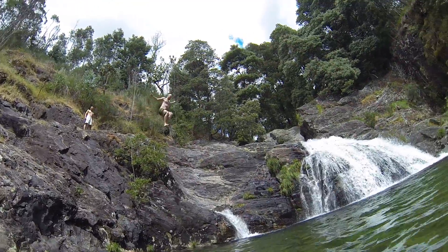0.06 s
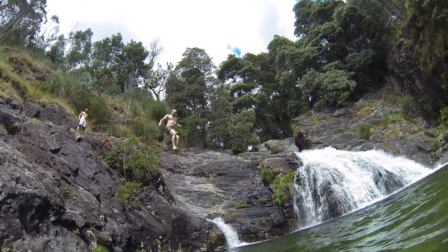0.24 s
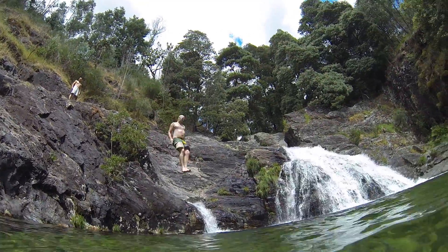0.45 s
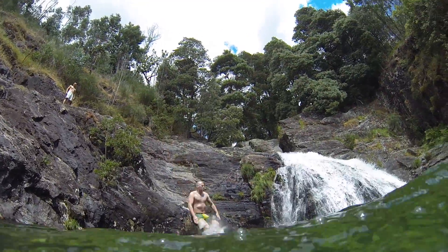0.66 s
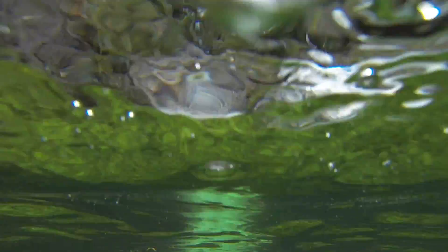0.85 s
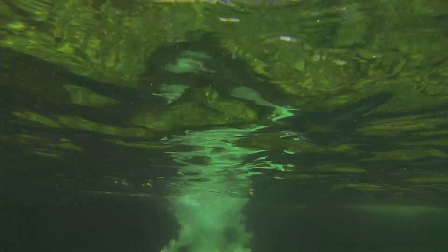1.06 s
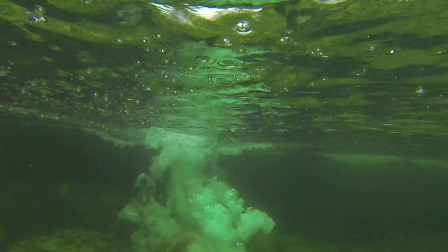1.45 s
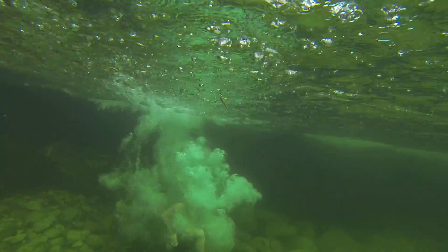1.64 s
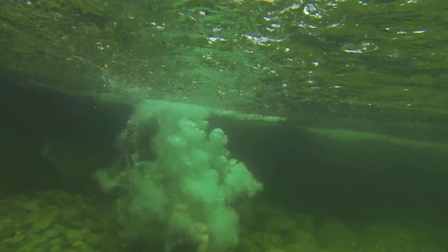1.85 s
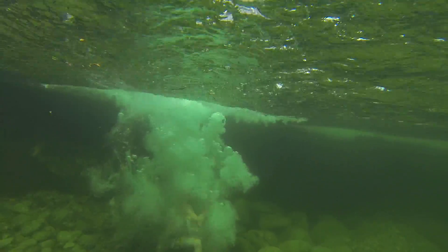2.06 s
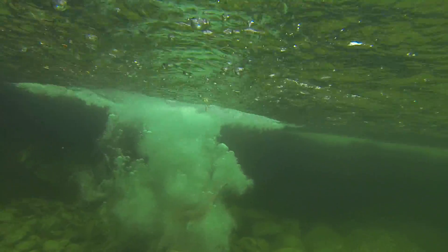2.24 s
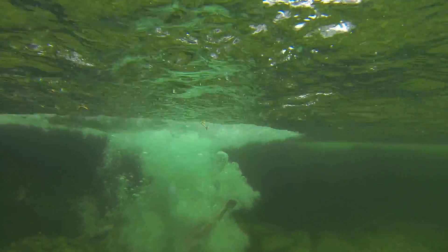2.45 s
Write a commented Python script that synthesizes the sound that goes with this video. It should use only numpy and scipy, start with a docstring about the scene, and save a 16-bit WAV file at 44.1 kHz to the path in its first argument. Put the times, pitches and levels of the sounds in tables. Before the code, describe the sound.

Water slaps and gulps close by, then gives way to a muffled underwater gurgling roar.

```python
"""Dipping under at a waterfall pool

A camera in a waterproof housing bobs on a pool below a waterfall, then dips under as someone jumps in.
Wavelets slap the housing and excite the air cavity at its microphone. Bubbles pinch off and ring
as mass-spring oscillators, a large one with a deep gulp. Under water the roar of the fall and of
the jumper's bubble cloud swells over a low rumble."""
import sys
import numpy as np
from scipy import signal
from scipy.fft import rfft, irfft
from scipy.io import wavfile
from scipy.ndimage import uniform_filter1d

SR = 44100
rng = np.random.default_rng(int(sys.argv[2]) if len(sys.argv) > 2 else 0)


def transcribe(u):
    """Save the signal u as a 16-bit wav file named by the first command-line argument.

    u: samples, shape (n,) or (channels, n), limited to [-1, 1]; the rate is SR.
    q: integer samples, one column per channel.
    """
    v = np.clip(np.atleast_2d(u).T, -1, 1)
    q = np.round(v * 32767).astype(np.int16)
    wavfile.write(sys.argv[1], SR, q)


N = 114660
TIME = np.arange(N) / SR
AGE = np.arange(int(.3 * SR)) / SR  # seconds since the start of one event

# Spectra, as relative power per hertz. Columns: frequency_hz, density_db
FALL_SPECTRUM = [(100, -7.5), (220, -11), (320, -20), (700, -19.5), (1050, -24.5), (1300, -6.5), (1520, 0),
                 (1850, -13), (2500, -20), (3400, -19), (4200, -27.5), (5000, -28), (8000, -36),
                 (11000, -40.5), (14500, -49), (16000, -65)]  # waterfall in air, heard through the housing
WIND_SPECTRUM = [(20, -9), (62, 13), (105, -7.5), (220, -29), (330, -47.5)]  # wind on the housing
ROAR_SPECTRUM = [(100, -7), (240, -8), (340, -10), (500, -3.5), (610, 1.5), (760, 0.5), (950, -8.5),
                 (1120, -8.5), (1270, -23), (1450, -7.5), (1590, -2.5), (1800, -19.5), (2080, -19),
                 (2400, -29), (3200, -33), (3750, -26.5), (4400, -42.5), (5200, -30.5), (6000, -44.5),
                 (8200, -43.5), (9800, -58), (11500, -44), (13200, -56), (16000, -69)]  # bubble clouds under water
BURBLE_SPECTRUM = [(70, -30), (130, -4.5), (235, 0), (340, -8), (500, -56)]  # the jumper's plunge
FIZZ_SPECTRUM = [(1200, -16), (2000, 4.5), (3400, 0.5), (4400, -15.5), (5200, -18.5), (6200, -18.5),
                 (8500, -23), (13000, -26), (15000, -60)]  # the spreading cloud
RUMBLE_SPECTRUM = [(8, -7.5), (25, 5), (46, -1.5), (65, -9.5), (100, -22.5), (160, -38), (400, -68)]  # flow round the housing

# Envelopes. Columns: time_s, level_db
FALL_LEVEL = [(0, -39.5), (.2, -36.5), (.4, -34.5), (.412, -48.5), (.68, -53.5), (.705, -48.5), (.715, -32),
              (.79, -42.5), (.82, -58), (.95, -76)]  # airborne sound, lost as water covers the microphone
ROAR_LEVEL = [(.72, -70), (.96, -45), (1.15, -50), (1.35, -45.5), (1.6, -43.5), (1.85, -38.5),
              (2.06, -36.5), (2.3, -35.5), (2.6, -38.5)]  # bubble clouds under water
BURBLE_LEVEL = [(1.4, -87), (1.6, -49), (1.8, -51.5), (2.1, -56), (2.6, -79)]  # the jumper's plunge
FIZZ_LEVEL = [(1.15, -78), (1.3, -63.5), (1.6, -56), (2.1, -51.5), (2.58, -50.5)]  # the spreading cloud
RUMBLE_LEVEL = [(0, -43.5), (.25, -33.5), (.38, -31.5), (.43, -41.5), (.6, -45), (.78, -46.5), (.88, -48),
                (1.2, -44.5), (1.45, -40.5), (1.54, -35.5), (2.1, -39), (2.6, -33.5)]  # flow round the housing
PATTER_LEVEL = [(0, -47.5), (.2, -36.5), (.36, -47), (.41, -54), (.465, -56), (.48, -45), (.535, -37.5),
                (.58, -51.5), (.72, -56.5), (.775, -34.5), (.9, -75)]  # droplets and ripples at the surface
FROTH_LEVEL = [(.46, -65), (.525, -42), (.6, -57.5), (.7, -75), (.745, -45), (.77, -27), (.805, -37.5),
               (.845, -28.5), (.868, -44), (.885, -35.5), (.925, -26.5), (.96, -49), (1.0, -57),
               (1.022, -34.5), (1.06, -58), (1.2, -71)]  # froth as the surface washes over

# Dull, short thumps of water, and the plop that opens the gulp.
# Columns: start_s, pitch_hz, level_db, t60_s
THUMPS = [(.427, 194, -23, 0.017), (.539, 176, -10, 0.011), (.7566, 237, -8, 0.0022),
          (.779, 66, -22, 0.014), (.838, 325, -13, 0.0022), (0.9185, 207, -12, 0.0074),
          (.9188, 414, -5.5, 0.0083), (2.281, 38, -19, .09)]
# Water films snapping against the housing. Columns: start_s, centre_hz, level_db
SNAPS = [(0.217, 8650, -32), (.3385, 860, -27), (.489, 4830, -36.5), (.786, 3770, -22.5),
         (0.7424, 6100, -20), (0.7777, 8000, -22.5), (0.854, 6300, -30.5), (0.8562, 12200, -34),
         (0.877, 7900, -30), (0.9064, 4660, -32), (0.9141, 9100, -17.5), (0.914, 3380, -19),
         (.9681, 10400, -45.5), (.9732, 2100, -30.5), (0.9879, 3700, -29), (1.0087, 2740, -28),
         (1.013, 2230, -26), (1.0974, 5020, -39), (1.2157, 2310, -32.5), (1.629, 1960, -33.5),
         (1.866, 8800, -50), (2.272, 3230, -35)]
# Bubbles pinching off. Columns: start_s, pitch_hz, level_db, t60_s
BUBBLES = [(0.247, 2000, -11, 0.0079), (.261, 1845, -20.5, .02), (.266, 1285, -26.5, .02),
           (.299, 673, -37.5, 0.06), (0.307, 1570, -18.5, 0.018), (.3935, 2520, -29, 0.011),
           (0.5314, 875, -19, 0.013), (.5385, 774, -3.5, 0.021), (.556, 1400, -23, 0.0096),
           (.584, 2260, -30.5, 0.012), (0.613, 1338, -22, .015), (.695, 823, -29.5, 0.025),
           (0.7454, 1930, -5, 0.0066), (.7535, 5030, -19.5, 0.0047), (0.7577, 3660, -9, 0.0055),
           (.758, 2000, -9.5, 0.015), (0.78, 2690, -12, 0.0027), (0.7783, 1090, -24.5, 0.016),
           (0.812, 1370, -18.5, 0.013), (.8133, 605, -20, 0.01), (0.819, 2120, -21, 0.011),
           (.826, 526, -21, 0.014), (.8385, 910, -15.5, 0.02), (0.8522, 470, -21, 0.0081),
           (.853, 3170, -22, 0.0053), (0.874, 2950, -16, 0.0025), (.88, 1415, -25, 0.029),
           (.881, 555, -27.5, 0.023), (0.8922, 3560, -31, 0.0065), (.9057, 915, -26, 0.012),
           (.919, 518, -15.5, 0.013), (0.9304, 4990, -19.5, 0.0081), (.938, 591, -35, 0.11),
           (.949, 1085, -32, 0.034), (1.02, 1376, -29, .012), (1.028, 3390, -34, .01),
           (1.03, 983, -34, .033), (1.0925, 2000, -30.5, 0.016), (1.104, 2994, -33, 0.017),
           (1.104, 980, -35, 0.036), (1.2158, 3730, -28, 0.0083), (1.305, 815, -37, .06),
           (1.627, 830, -29, 0.017), (1.682, 560, -30.5, 0.0088), (1.871, 632, -30, 0.041),
           (1.994, 1953, -36.5, 0.014), (2.552, 3230, -35.5, 0.014)]
# Wavelet impacts. Columns: start_s, pitch_hz, level_db, t60_s, crack_re_ring_db
SLAPS = [(0.2463, 1401, -18, 0.028, -22), (0.3392, 1900, -22.5, 0.017, -31),
         (0.423, 1340, -27.5, 0.029, -9), (0.4266, 1500, 1.5, 0.0057, -26), (.482, 1140, -36, 0.028, -16),
         (0.512, 1440, -28, 0.014, -26), (.538, 1307, -4, 0.009, -16), (.5475, 1410, -12.5, 0.01, -43),
         (0.7574, 1510, -2, 0.0078, -6), (.763, 1540, -7.5, 0.0085, -27), (.773, 1560, -14.5, .008, -4),
         (0.7755, 1620, -10, 0.011, -20), (0.7923, 1350, -12, 0.005, -12),
         (0.8297, 1454, -2.5, 0.0069, -26), (0.8538, 1540, -20.5, 0.012, -13)]

BUBBLE_RISE_CYCLES, BUBBLE_GLIDE = 1.87, 0.0088  # glide: fractional rise in pitch per t60
RING_CURVE = 1.68  # air pockets hold their ring, then collapse


def amp(db):
    """Amplitude grows tenfold for every 20 dB."""
    return 10 ** (np.asarray(db) / 20)


def unit(x):
    """Normalisation to rms 1."""
    return x / np.sqrt(np.mean(x ** 2) + 1e-20)


def level(points):
    """Gain envelope, interpolated in decibels between rows of time_s, level_db."""
    return amp(np.interp(TIME, *np.transpose(points)))


def fade(t60_s, curve=1):
    """Damping by 60 dB in t60_s: exponential at curve 1, ever faster above it."""
    return np.exp(-np.log(1000) * (AGE / t60_s) ** curve)


def onset(rise_s):
    """Raised-cosine attack from 0 to 1."""
    return np.sin(np.pi / 2 * np.minimum(AGE / rise_s, 1)) ** 2


def add(mix, start_s, sound):
    """Superposition of one event on the mix."""
    part = mix[max(round(start_s * SR), 0):][:len(sound)]
    part += sound[:len(part)]


def colour(x, spectrum, cavity_hz=1656, ripple_db=1):
    """Filtering by a spectrum, rippled by the overtones of the microphone cavity; rms 1."""
    hz, db = np.transpose(spectrum)
    f = np.fft.rfftfreq(N, 1 / SR)
    overtones_db = ripple_db * np.cos(2 * np.pi * f / cavity_hz) * (f > 2100) * (f < 9500)
    outline_db = np.interp(np.log(f + 1), np.log(hz), db)
    return unit(irfft(rfft(x) * amp(outline_db + overtones_db), N))


def churn(depth_db, patch_cells):
    """Random amplitude modulation of noise, in small patches of time and frequency."""
    cells = signal.stft(rng.standard_normal(N), nperseg=512)[2]
    patches = uniform_filter1d(rng.standard_normal(cells.shape), patch_cells, axis=0)
    patches = unit(uniform_filter1d(patches, patch_cells, axis=1))
    return unit(signal.istft(cells * amp(depth_db * patches), nperseg=512)[1][:N])


def clicks(per_s, spread_db):
    """Shot noise: independent impulses, a few of them large."""
    size = amp(spread_db * np.minimum(rng.exponential(1, N), 4))
    return size * rng.choice([-1, 1], N) * (rng.random(N) < per_s / SR)


def ring(hz, t60_s, rise_s, glide=0):
    """A damped oscillator swings up and dies away; a glide raises its pitch as it rings."""
    shape = onset(rise_s) * fade(t60_s, RING_CURVE)
    pitch_hz = hz * (1 + glide * np.minimum(AGE / t60_s, 2))
    return shape / shape.max() * np.sin(2 * np.pi * np.cumsum(pitch_hz) / SR)


def burst(hz, relative_width, t60_s):
    """Response of a damped resonance to an impulse and a decaying spray of noise; peak 1."""
    drive = 0.41 * rng.standard_normal(len(AGE)) * fade(t60_s)
    drive[0] += 1
    edges_hz = np.clip([hz / (1 + relative_width / 2), hz * (1 + relative_width / 2)], 50, .49 * SR)
    band = signal.sosfilt(signal.butter(1, edges_hz, "band", fs=SR, output="sos"), drive)
    softened = signal.sosfilt(signal.butter(2, min(0.97 * hz, .45 * SR), fs=SR, output="sos"), band)
    return softened / abs(softened).max()


def echo(x, tail_db=-12.5, cutoff_hz=3020):
    """Reverberation in the housing and the water round it adds a short, dull tail."""
    tail = rng.standard_normal(len(AGE)) * fade(t60_s=0.027) * onset(rise_s=0.0016)
    tail = signal.sosfilt(signal.butter(2, cutoff_hz, fs=SR, output="sos"), tail / np.linalg.norm(tail))
    return x + amp(tail_db) * signal.oaconvolve(x, tail)[:N]


def waterfall():
    """Housing resonance makes the fall's rush nasal, over a little wind; water shuts both out."""
    rush = colour(churn(depth_db=3.5, patch_cells=4), FALL_SPECTRUM)
    wind = amp(-2.5) * colour(rng.standard_normal(N), WIND_SPECTRUM)
    return level(FALL_LEVEL) * (rush + wind)


def glugs(per_s=260, sizes=40, t60_cycles=38.6):
    """Larger bubbles in the jumper's cloud resonate at random moments, each size at its own pitch."""
    out = np.zeros(N)
    for hz in np.geomspace(538.3, 3770, sizes):
        births = clicks(per_s / sizes, spread_db=3.5)
        pulsation = hz * ring(hz, t60_cycles / hz, BUBBLE_RISE_CYCLES / hz, BUBBLE_GLIDE)
        out += signal.oaconvolve(births, pulsation)[:N]
    return unit(out)


def roar():
    """Distant bubbles under water sum incoherently to a muffled, gurgling roar with faint pops."""
    pops = amp(-14) * unit(clicks(per_s=77, spread_db=0.5))
    clouds = colour(churn(depth_db=0.63, patch_cells=6) + pops, ROAR_SPECTRUM)
    gurgle = amp(-3.5) * colour(glugs(), ROAR_SPECTRUM)
    return level(ROAR_LEVEL) * unit(clouds + gurgle)


def burble():
    """The plunge radiates a low band of noise."""
    return level(BURBLE_LEVEL) * colour(rng.standard_normal(N), BURBLE_SPECTRUM)


def fizz():
    """Tiny bubbles in the spreading cloud tick independently, giving faint shot noise."""
    return level(FIZZ_LEVEL) * colour(clicks(per_s=1800, spread_db=1.5), FIZZ_SPECTRUM)


def rumble():
    """Fluctuating forces from water and handling buffet the housing at low frequencies."""
    return level(RUMBLE_LEVEL) * colour(rng.standard_normal(N), RUMBLE_SPECTRUM)


def patter():
    """Impacts of drops and ripples excite the same nasal resonance that colours the waterfall."""
    return level(PATTER_LEVEL) * colour(clicks(per_s=1800, spread_db=8.5), FALL_SPECTRUM)


def froth(per_s=5000, sizes=32, t60_cycles=19, tilt_db_per_octave=-6.5, submerged_s=0.94):
    """Resonance of many tiny bubbles: the smaller they are, the higher, shorter and fainter."""
    out = np.zeros(N)
    for hz in np.geomspace(477, 12200, sizes):
        gain = amp(tilt_db_per_octave * np.log2(max(hz / 1500, 1)))
        pulsation = gain * ring(hz, t60_cycles / hz, 1 / hz, BUBBLE_GLIDE)
        muffle = amp(-36 * (TIME > submerged_s) * (hz > 4000))  # under water the smallest go quiet
        births = clicks(per_s / sizes, spread_db=4.5) * muffle
        out += signal.oaconvolve(births, pulsation)[:N]
    return level(FROTH_LEVEL) * unit(out)


def thumps(rise_cycles=0.39):
    """Heavily damped oscillations: dull, short thumps of water, and the plop that opens the gulp."""
    out = np.zeros(N)
    for start_s, hz, db, t60_s in THUMPS:
        add(out, start_s, amp(db) * ring(hz, t60_s, rise_cycles / hz))
    return out


def snaps():
    """Films of water snap against the housing, each a brief band-limited transient."""
    out = np.zeros(N)
    for start_s, hz, db in SNAPS:
        add(out, start_s, amp(db) * burst(hz, relative_width=0.19, t60_s=0.0068))
    return out


def bubbles():
    """Minnaert resonance: a nearby bubble pinches off and rings, its air the spring, water the mass."""
    out = np.zeros(N)
    for start_s, hz, db, t60_s in BUBBLES:
        add(out, start_s, amp(db) * ring(hz, t60_s, BUBBLE_RISE_CYCLES / hz, BUBBLE_GLIDE))
    return out


def gulp(start_s=.9192, hz=405, rise_hz_per_s2=2600):
    """The last pocket of air resonates as a large bubble, then hums on, rising in pitch as it floats up."""
    out = np.zeros(N)
    quick = amp(-1.5) * fade(t60_s=0.039)
    lingering = amp(-26.5) * fade(t60_s=0.23, curve=RING_CURVE)
    pitch_hz = hz + rise_hz_per_s2 * AGE ** 2
    tone = np.sin(2 * np.pi * np.cumsum(pitch_hz) / SR)
    add(out, start_s, onset(1 / hz) * (quick + lingering) * tone)
    return out


def slaps(rise_s=0.00121):
    """Impact excitation: wavelets crack on the housing and ring the air in its microphone cavity."""
    out = np.zeros(N)
    for start_s, hz, db, t60_s, crack_db in SLAPS:
        add(out, start_s, amp(db) * ring(hz, t60_s, rise_s))
        crack = burst(hz=3250, relative_width=0.69, t60_s=0.011)
        add(out, start_s + rise_s / 2, amp(db + crack_db) * crack)
    return out


def scene():
    """Superposition at one microphone; the close events reverberate."""
    background = waterfall() + roar() + burble() + fizz() + rumble() + patter() + froth()
    close = slaps() + snaps() + thumps() + bubbles() + gulp()
    return (background + echo(close))[None]


def record(dry, treble_hz=14000, band_limit_hz=15800):
    """Clipping at full scale, then low-pass filtering: a soft roll-off and a steep band limit."""
    clipped = np.clip(dry, -1, 1)
    dull = signal.sosfilt(signal.butter(4, treble_hz, fs=SR, output="sos"), clipped)
    band_limit = signal.firwin(255, band_limit_hz, window=("kaiser", 9), fs=SR)
    return signal.oaconvolve(dull, band_limit[None], "same")


dry = scene()
out = record(dry)
transcribe(out)
```